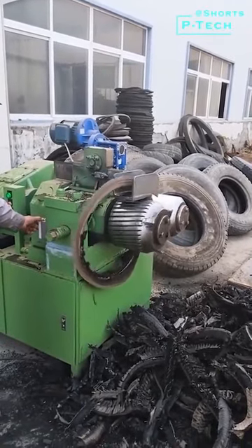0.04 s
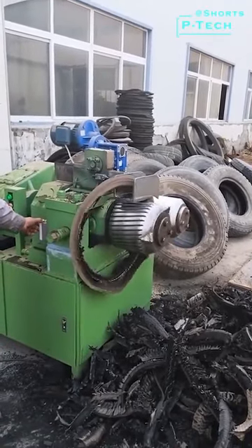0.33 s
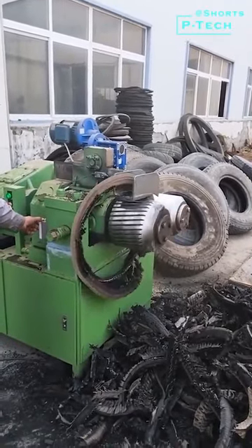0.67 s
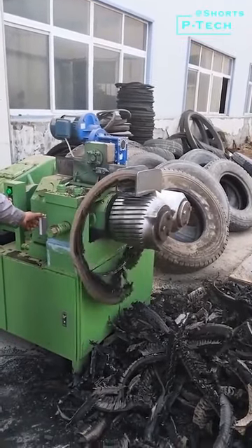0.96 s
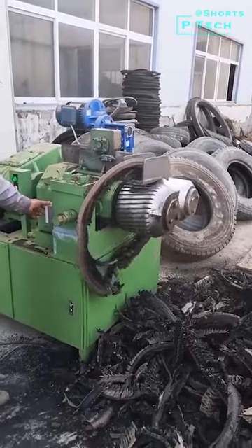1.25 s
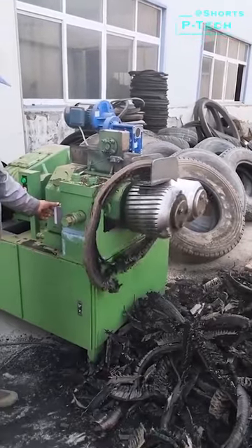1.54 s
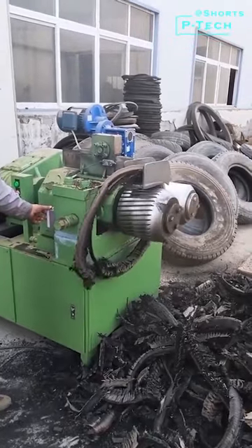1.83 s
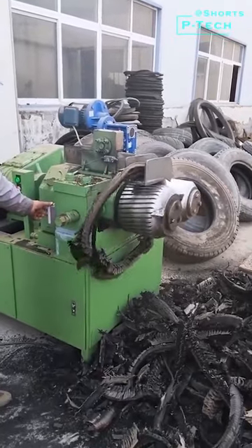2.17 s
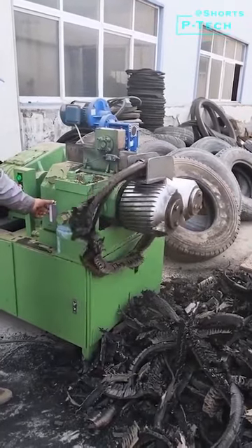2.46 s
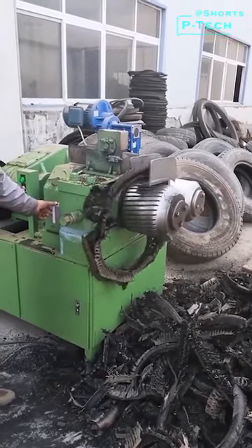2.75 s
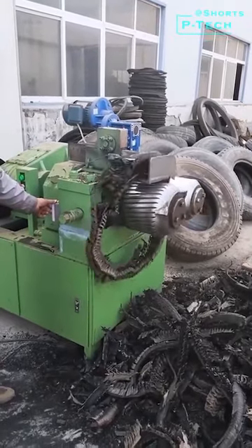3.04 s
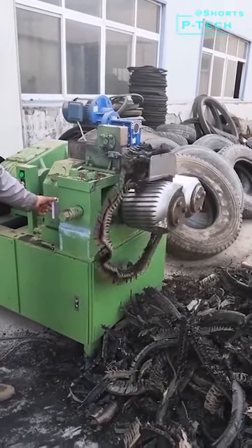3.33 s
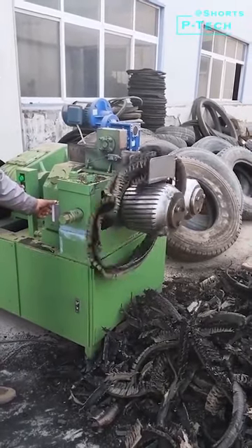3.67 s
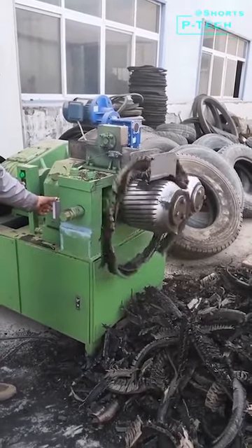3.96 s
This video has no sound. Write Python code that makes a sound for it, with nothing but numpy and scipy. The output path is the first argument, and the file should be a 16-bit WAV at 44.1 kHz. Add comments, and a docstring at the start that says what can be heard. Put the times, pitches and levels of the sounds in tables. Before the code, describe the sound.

A tyre stripping machine tears rubber with rough crackling and snaps over a booming rumble.

```python
"""Rubber crackles over a booming steel cabinet: a tyre stripper in a yard, close to a stereo microphone pair.
A ribbed roller tears the rubber off a bead wire: fibres crackle, cords snap and strips rip away.
The slipping rubber jolts the cabinet and groans on the roller; behind it the motor hums and gears whine.
After about 3.3 s the wire comes free and the drive runs on more lightly."""
import sys
import numpy as np
from scipy import signal
from scipy.fft import rfft, irfft
from scipy.io import wavfile

SR = 44100
rng = np.random.default_rng(int(sys.argv[2]) if len(sys.argv) > 2 else 0)


def master(y):
    """Save y as 16-bit WAV."""
    cut = np.clip(np.atleast_2d(y).T, -1, 1)
    pcm = np.round(cut * 32767)  # scale
    wavfile.write(sys.argv[1], SR, pcm.astype(np.int16))


N = 176400
TIME = np.arange(N) / SR


# tearing at the roller, nearest the microphones: t/s, level/dB
TEARING_LEVEL = [(0, -25.5), (.08, -30.5), (.14, -25.5), (.24, -31.5), (.27, -26.5), (.42, -32),
                 (.53, -27.5), (.61, -34.5), (.75, -26.5), (1.02, -25), (1.13, -26), (1.5, -27.5),
                 (1.64, -23.5), (1.85, -28.5), (2.13, -27), (2.24, -33), (2.54, -32), (2.62, -32),
                 (2.81, -36), (2.87, -39.5), (2.98, -40), (3.04, -30.5), (3.22, -26.5), (3.33, -43),
                 (4, -46)]
# tone of tearing rubber: f/Hz, level/dB
RUBBER_SPECTRUM = [(200, -24.5), (600, -11.5), (1100, -1.5), (1450, 1), (1700, -3.5), (2200, -0.5),
                   (3300, 1), (4500, -2), (5500, -2), (6350, -4.5), (6650, -10.5), (7200, -7), (7950, -5.5),
                   (8400, -17), (8800, -23), (9400, -28.5), (9800, -51.5), (11000, -45)]
# cords snapping and strips ripping away: t/s, level/dB, length/s, brightness/(dB per octave)
CORD_SNAPS = [(0.196, -21, 0.005, 6), (0.248, -14, 0.004, -4), (.451, -15, 0.0047, -4),
              (0.639, -19, 0.005, 4), (0.722, -21, 0.006, -5), (0.934, -21, 0.004, -0.5),
              (1.029, -22, .003, 0), (1.065, -16.5, 0.006, -3), (1.172, -17, 0.0028, -2),
              (1.334, -19.5, 0.005, -2), (1.371, -18, 0.006, -0.5), (1.544, -16.5, 0.004, 3),
              (1.660, -21.5, 0.005, 2.5), (1.720, -14.5, 0.005, 4), (2.257, -18, .006, 0),
              (2.322, -14.5, 0.004, -3), (2.440, -16, .006, -1), (2.524, -26, 0.009, -2),
              (2.595, -22, 0.005, -3), (2.996, -30, 0.006, 1), (3.021, -26, .006, 3),
              (3.059, -27.5, .006, 1), (3.246, -25, 0.01, -3.5), (3.5, -29, 0.0035, 1)]
STRIP_RIPS = [(0.559, -23, 0.019, -1), (2.291, -22, 0.011, 3.5), (2.372, -22, 0.05, -1),
              (2.565, -18.5, 0.014, -4), (2.612, -24.5, 0.054, -5.5), (2.663, -18.5, 0.011, -2),
              (3.133, -22, 0.014, 1), (3.148, -30, 0.04, -3.5), (3.212, -27.5, 0.018, -4.5)]
# tone of a snap, and of the thud as it tugs the roller: f/Hz, level/dB
SNAP_SPECTRUM = [(300, -12), (1400, -4.5), (2100, -0.5), (2700, 4.5), (3300, 6), (4400, 6), (6700, -6.5),
                 (7900, -9.5), (8800, -24.5), (10800, -35)]
TUG_SPECTRUM = [(60, -29), (200, -19.5), (290, 5), (410, -1.5), (540, -8), (2000, -58)]

def rubber(grip):
    """Fibres tear in crackling clumps; snaps and rips tug at the roller, harder under load."""
    fibres = clicks(per_s=5000, spread_db=2.3) * grip * amp(2.1 * drift(32))
    # the tearing dips around each snap, while the taut cord takes the pull
    near_snap = np.max([np.exp(-((TIME - snap[0]) / .014) ** 2) for snap in CORD_SNAPS], axis=0)
    tearing_db = curve(TEARING_LEVEL) + .5 - 2.3 * near_snap
    crackle = colour(unit_rms(fibres) * amp(tearing_db), RUBBER_SPECTRUM)
    out, tugs = stretch(crackle, depth_db=2), np.zeros((2, N))
    for start, db, length, tilt in CORD_SNAPS:
        snap = colour(fibre_burst(length), SNAP_SPECTRUM, tilt)
        add(out, start, amp(db - .2) * stretch(snap, depth_db=2.6))
        add(tugs, start, amp(db - 5) * fibre_burst(length))
    for start, db, length, tilt in STRIP_RIPS:
        rip = fibre_burst(length)
        crunch = amp(2.2 * drift(250)[:rip.shape[1]])
        add(out, start, amp(db - 1.5) * colour(rip * crunch, RUBBER_SPECTRUM, tilt))
        add(tugs, start, amp(db) * fibre_burst(length))
    return out + colour(tugs, TUG_SPECTRUM) * amp(curve(ROLLER_LOAD) - REFERENCE_LOAD_DB)


def fibre_burst(length, rise_s=.001, fall_s=.0016):
    """A run of fibres failing together: quick rise, hold, quick fall."""
    t = np.arange(SR // 10) / SR
    envelope = np.minimum(t / rise_s, 1) * np.exp(-np.maximum(t - length, 0) / fall_s)
    return envelope * rng.standard_normal((2, len(t)))


def stretch(x, depth_db, patch_hz=288, patch_s=.071):
    """The resonances of the stretched rubber come and go as it gives way; the overall level stays."""
    spectra = signal.stft(x, nperseg=512, noverlap=384)[2]
    noise = rng.standard_normal(spectra.shape[1:])
    across = np.fft.fftfreq(spectra.shape[1], SR / 512)[:, None]
    along = np.fft.fftfreq(spectra.shape[2], 128 / SR)
    smoothing = np.exp(-(across * patch_hz) ** 2 - (along * patch_s) ** 2)
    patches = unit_rms(np.fft.ifft2(np.fft.fft2(noise) * smoothing).real)
    shifted = signal.istft(spectra * amp(depth_db * patches), nperseg=512, noverlap=384)[1]
    return x.std() * unit_rms(shifted[:, :x.shape[1]])


def ribs(rate_hz=51.64, depth=.11):
    """The grip pulses as each rib of the roller bites."""
    bites = np.cumsum(rate_hz * (1 + .0314 * drift(2.2))) / SR
    return 1 + depth * np.cos(2 * np.pi * bites)


# load on the roller: t/s, level/dB
ROLLER_LOAD = [(0, -25.5), (.25, -22), (.6, -24.5), (.77, -24), (1.15, -26.5), (1.5, -25), (1.68, -23.5),
               (1.95, -23), (2.28, -24.5), (2.4, -23), (2.54, -24), (2.64, -25), (2.73, -25.5), (2.95, -30),
               (3.22, -25), (3.4, -32.5), (4, -35.5)]
REFERENCE_LOAD_DB = -21
# rumble of the roller: f/Hz, level/dB
RUMBLE_SPECTRUM = [(20, -30), (75, -4.5), (110, 4), (160, 5.5), (190, -3), (320, -2), (420, -6), (500, -20),
                   (750, -14.5), (1100, -13.5), (2000, -30.5), (6000, -76.5)]
# resonances of the steel cabinet: f/Hz, width/Hz, level/dB relative to the load
CABINET_MODES = [(148.54, 14.4, -2.5), (252, 35, -8.5), (354.3, 18.8, -6), (398.6, 25.5, -9.5)]
# the tyre ring judders and the cabinet booms: t/s, level/dB, length/s
CABINET_BOOMS = [(.12, -19, 0.065), (.25, -18.5, 0.039), (.34, -18, 0.096), (.44, -14, 0.094),
                 (.58, -18.5, 0.12), (.71, -24, 0.18), (.86, -17, .15), (.97, -13.5, .16), (1.27, -19, .14),
                 (1.43, -15.5, 0.079), (1.76, -12, 0.12), (1.92, -17.5, .35), (2.41, -21, 0.096),
                 (2.77, -19.5, .09), (3.04, -24, 0.2), (3.22, -21, 0.084), (3.72, -27.5, .14)]
# rubber sticks and slips on the roller with a groan or squeak: t/s, level/dB, length/s, f/Hz
SLIP_GROANS = [(0.332, -24.5, .08, 366), (0.621, -30.5, .06, 980), (1.638, -20.5, .07, 349.4),
               (1.751, -23.5, 0.28, 353.4), (2.359, -26.5, .075, 354), (2.555, -23.5, 0.074, 391.4),
               (2.608, -22.5, 0.057, 263)]

def cabinet(grip, jolts_per_s=700):
    """Slipping rubber groans, shakes the roller and rings the cabinet; judder booms on the lowest mode."""
    jolts = clicks(jolts_per_s, spread_db=3.5) * grip
    rumble = amp(-.17) * unit_rms(colour(jolts, RUMBLE_SPECTRUM))
    ringing = sum(amp(db) * resonate(clicks(jolts_per_s, spread_db=1) * grip, hz, width)
                  for hz, width, db in CABINET_MODES)
    out = amp(curve(ROLLER_LOAD)) * (ringing + rumble)
    for start, db, length in CABINET_BOOMS:
        add(out, start, judder(db, length, hz=CABINET_MODES[0][0]))
    for start, db, length, hz in SLIP_GROANS:
        add(out, start, judder(db, length, hz))
    return out


def judder(db, length, hz, waver=.035):
    """A wavering vibration that builds up and dies again."""
    t = np.arange(0, length, 1 / SR)
    cycles = rng.random() + np.cumsum(hz * (1 + waver * drift(40)[:len(t)])) / SR
    return amp(db) * np.sin(np.pi * t / length) * unit_rms(np.sin(2 * np.pi * cycles))


# motor noise, behind the tearing: f/Hz, level/dB
MOTOR_SPECTRUM = [(25, -8.5), (150, 0.5), (260, -5), (410, -1), (520, -8), (1050, -9), (3600, -19.5),
                  (5600, -27), (6600, -56), (7700, -45), (9200, -70)]
# hum of the drive: t/s, level/dB
HUM_LEVEL = [(0, -35), (2.6, -39), (2.9, -33), (3.6, -30.5), (4, -40.5)]
# pitch of the gear whine: t/s, f/Hz
WHINE_PITCH = [(0, 851), (.42, 895), (.53, 860), (.7, 890), (1.17, 830), (1.35, 885), (1.7, 828),
               (1.95, 880), (2.2, 852), (3.25, 841.4), (3.42, 885), (4, 872)]
# gear tones: multiple of the whine, level/dB, growth/(dB per dB of load), roughness
GEAR_TONES = [(1, -32, 0.65, 1.47), (1.125, -32.5, 0.93, 1.9)]

def drive(hum_hz=212.3, flutter_hz=42):
    """Motor noise, hum and gear whine; the gear tones grow with the load."""
    out = amp(-31) * unit_rms(colour(clicks(per_s=6000, spread_db=1.5), MOTOR_SPECTRUM))
    hum_swell = 1 + .7 * drift(20)
    hum_cycles = np.cumsum(hum_hz * (1 + .015 * drift(6))) / SR
    out += amp(curve(HUM_LEVEL)) * unit_rms(hum_swell * np.sin(2 * np.pi * hum_cycles))
    whine_cycles = np.cumsum(curve(WHINE_PITCH) * (1 + .013 * drift(17.6))) / SR
    quadrature = np.array([[1], [1j]])  # the channels lie a quarter cycle apart
    for multiple, db, growth, roughness in GEAR_TONES:
        flutter = np.array([drift(flutter_hz) + 1j * drift(flutter_hz) for _ in range(2)])
        tone = (1 + roughness * flutter) * np.exp(2j * np.pi * multiple * whine_cycles) * quadrature
        out += amp(db + growth * (curve(ROLLER_LOAD) - REFERENCE_LOAD_DB)) * unit_rms(tone.real)
    return out


def yard(x, level_db=-8, t60_s=.13):
    """Short scatter from the wall and tyre piles, reaching the microphones from 4 ms after the source."""
    t = np.arange(SR // 2) / SR
    echoes = rng.standard_normal((2, len(t))) * (rng.random((2, len(t))) < 2000 / SR)
    echoes *= (t > .004) * 1000 ** (-t / t60_s)
    return x + amp(level_db) * signal.fftconvolve(x, echoes / np.linalg.norm(echoes[0]), axes=1)[:, :N]


# likeness of the left and right microphones: f/Hz, correlation
PAIR_LIKENESS = [(300, 1), (450, 0.82), (580, 0.32), (800, 1), (980, 0.06), (1500, 0.42), (3400, 0.77),
                 (4500, 0.68), (5300, 0.26)]
# lean to the left microphone: f/Hz, left minus right/dB
PAIR_LEAN = [(380, 0.3), (600, 0.7), (3000, 0.7), (8000, 3.5)]

def microphone_pair(x, mono_below_hz=300):
    """Blends two unrelated channels into a stereo pair: one in the bass, wide in the treble."""
    hz, (first, second) = np.fft.rfftfreq(N, 1 / SR), rfft(x)
    width = 1 - 1 / (1 + (hz / mono_below_hz) ** 6)
    likeness = np.clip(spectrum_at(PAIR_LIKENESS, hz), -1, 1)
    lean = amp(width * spectrum_at(PAIR_LEAN, hz) / 2)
    mid = first * np.sqrt((1 + likeness) / 2)
    side = second * width * np.sqrt((1 - likeness) / 2)
    return irfft(np.array([(mid + side) * lean, (mid - side) / lean]), N)


def amp(db):
    """Decibels to gain."""
    return 10 ** (np.asarray(db) / 20)


def unit_rms(x):
    """Scales to rms 1."""
    return x / np.sqrt(np.mean(x ** 2) + 1e-20)


def spectrum_at(points, hz):
    """A spectrum table at the given frequencies."""
    f, value = np.transpose(points)
    return np.interp(np.log(hz + 1), np.log(f + 1), value)


def curve(points):
    """A time table at every sample."""
    return np.interp(TIME, *np.transpose(points))


def add(mix, start, sound):
    """Mixes a sound in at start seconds."""
    part = mix[..., max(round(start * SR), 0):][..., :sound.shape[-1]]
    part += sound[..., :part.shape[-1]]


def drift(hz):
    """Random wander of rms 1, up to about hz."""
    f = np.fft.rfftfreq(N, 1 / SR)
    return unit_rms(irfft(rfft(rng.standard_normal(N)) / (1 + (f / hz) ** 4), N))


def colour(x, points, tilt_db=0):
    """Causal filter with the given spectrum, tilted per octave; keeps the power of white noise."""
    hz = abs(np.fft.fftfreq(2048, 1 / SR))
    octaves = np.log2(np.clip(hz, 800, 7000) / 3000)
    log_gain = np.log(amp(spectrum_at(points, hz) + tilt_db * octaves))
    taps = np.fft.ifft(np.exp(np.conj(signal.hilbert(log_gain)))).real  # minimum phase
    return signal.fftconvolve(x, taps[None] / np.linalg.norm(taps), axes=1)[:, :N]


def resonate(x, hz, width):
    """A resonance with steep skirts."""
    b, a = signal.iirpeak(hz, hz / (1.55 * width), SR)
    return unit_rms(signal.lfilter(b, a, signal.lfilter(b, a, x)))


def clicks(per_s, spread_db):
    """Two trains of random clicks of uneven size."""
    size = amp(spread_db * np.minimum(rng.exponential(1, (2, N)), 4))
    return unit_rms(size * np.sign(rng.standard_normal((2, N))) * (rng.random((2, N)) < per_s / SR))


def scene():
    """The machine from close by; only the tearing rubber scatters round the yard."""
    grip = ribs()
    return microphone_pair(drive() + cabinet(grip) + yard(rubber(grip)))


def record(dry):
    """The recorder's band limit at 11 kHz."""
    return signal.oaconvolve(dry, signal.firwin(511, 11000, window=("kaiser", 9), fs=SR)[None], "same")


dry = scene()
out = record(dry)
master(out)
```